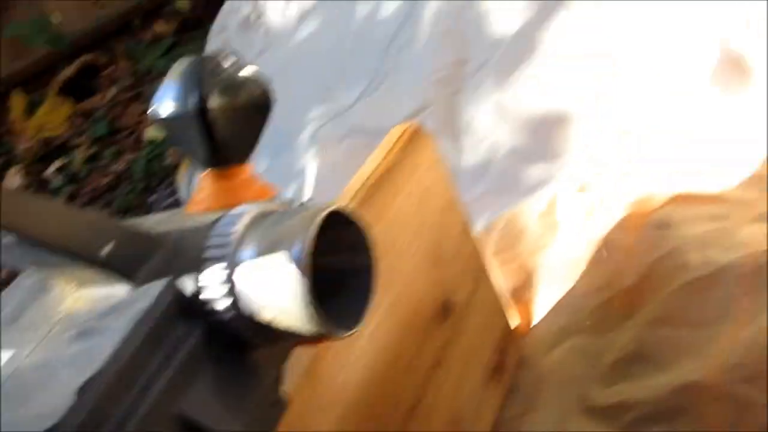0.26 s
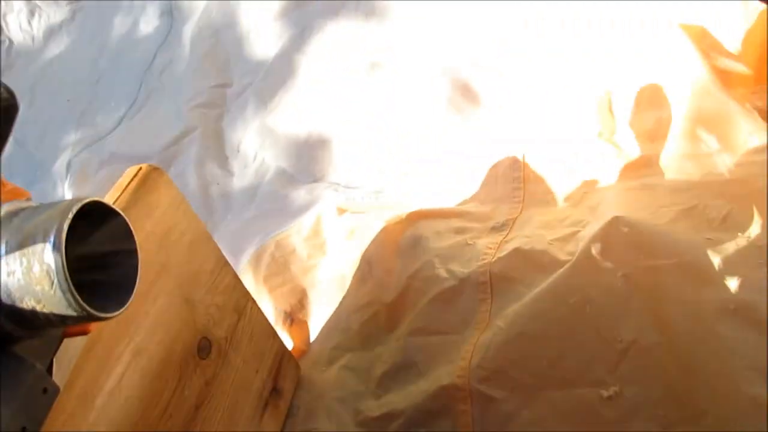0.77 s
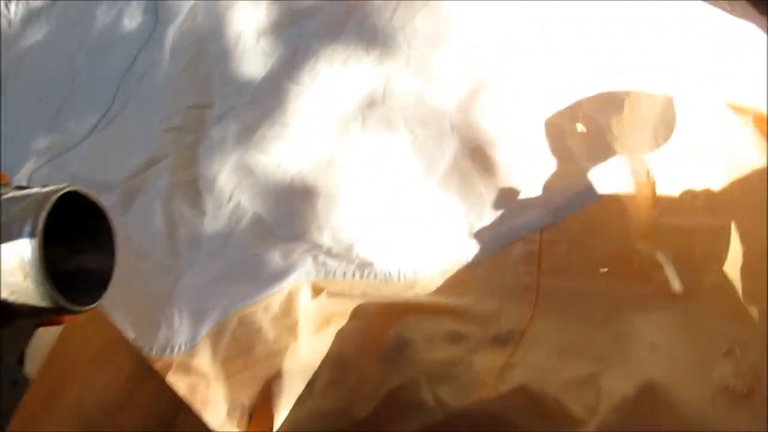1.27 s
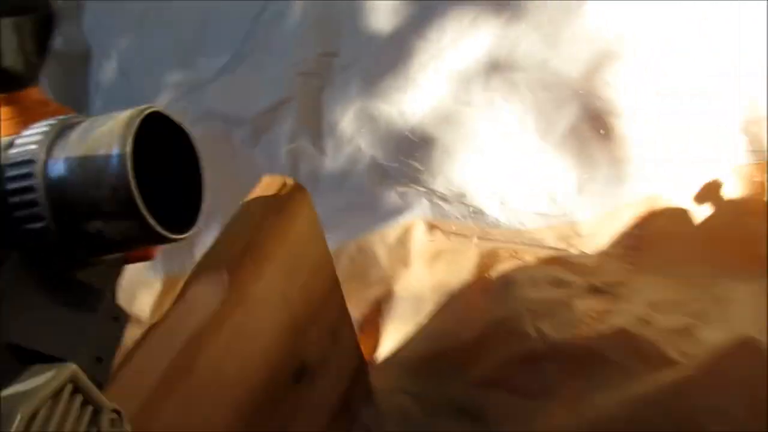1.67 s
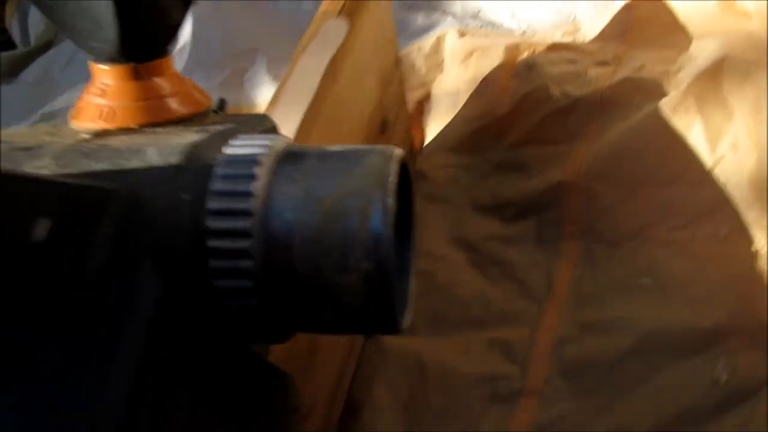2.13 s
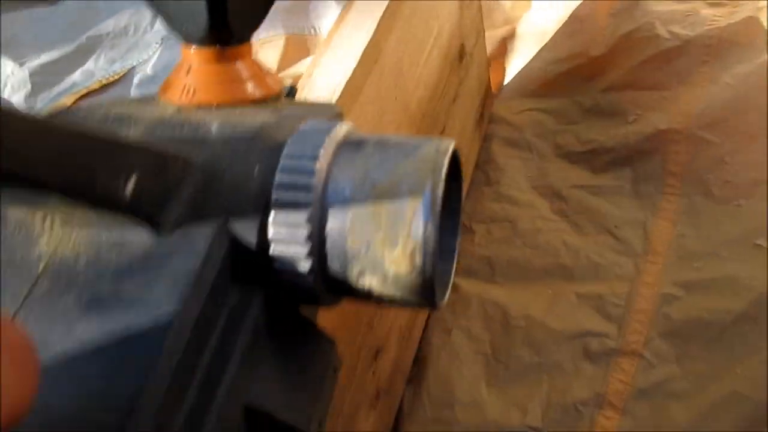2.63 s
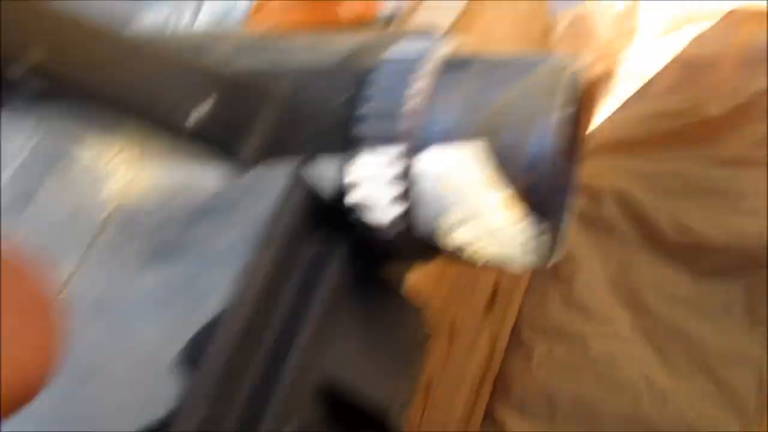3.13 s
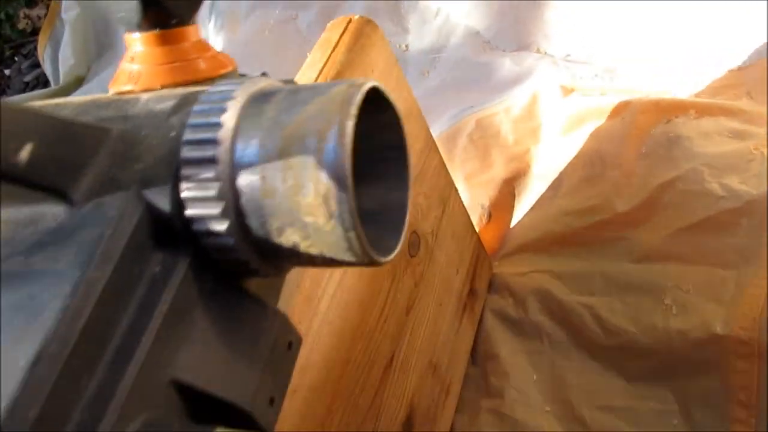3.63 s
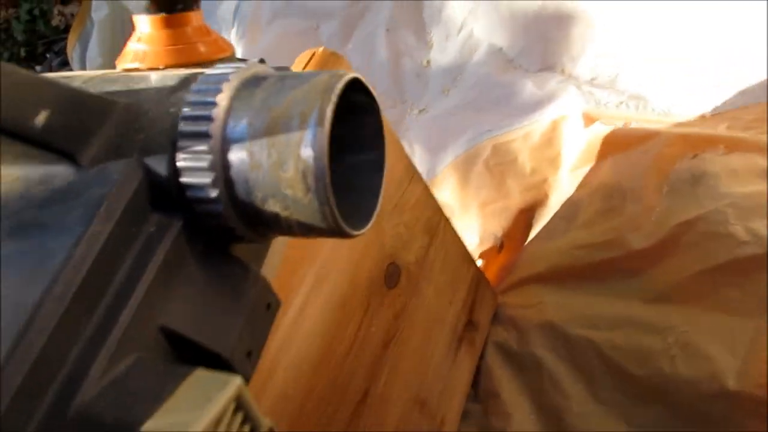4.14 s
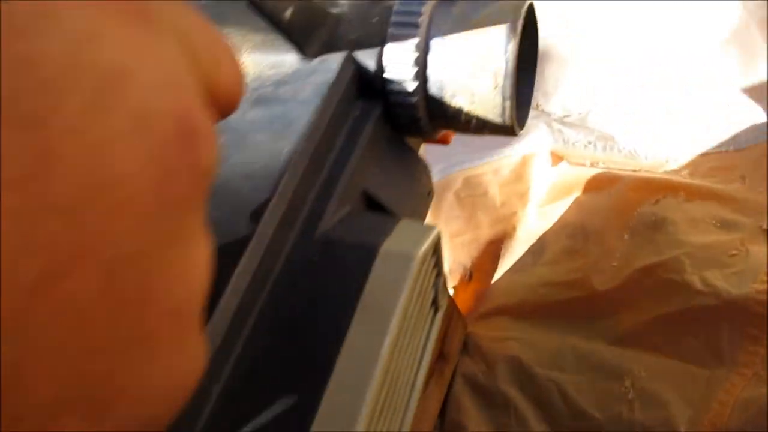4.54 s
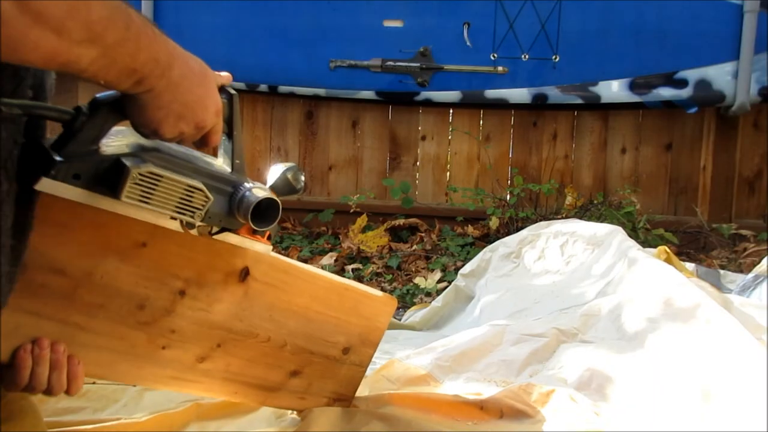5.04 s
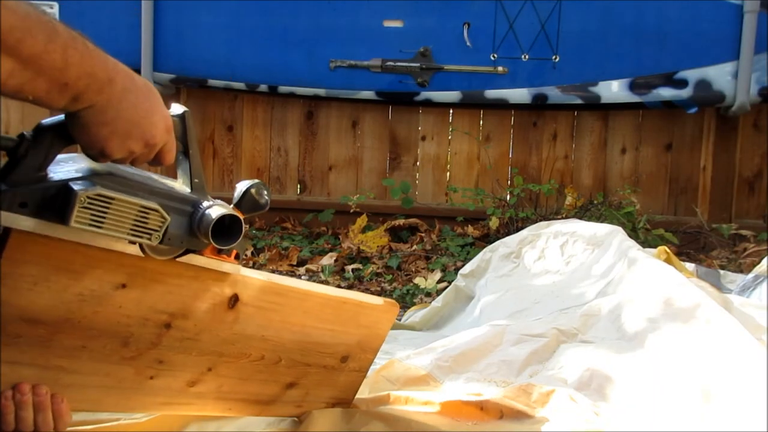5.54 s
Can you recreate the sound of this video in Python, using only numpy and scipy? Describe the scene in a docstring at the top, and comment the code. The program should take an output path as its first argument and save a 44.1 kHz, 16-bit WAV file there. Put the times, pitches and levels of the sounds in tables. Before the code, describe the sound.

Right beside the chip port, an electric planer cuts continuously with a rough, buzzing whine and blasting air, its pitch sagging and recovering. At about 4.7 seconds it cuts abruptly to a quiet yard, heard a step away: clattering knocks and a short scrape on wood, then the motor starts and sweeps quickly upward.

```python
"""Outdoors in a yard, an electric hand planer shaves a board edge, heard from right beside its chip port.
After a cut it is heard from a step away: standing still, set on the board with knocks and a scrape, starting up.
A belt ties the motor shaft to the two-knife drum, so both families of tones glide together.
Tones are sines at multiples of shaft speed; air is shaped noise chopped by the knives;
knocks, grit and the motor's buzz are impulses and noise that excite resonances."""
import sys
import numpy as np
from scipy import signal
from scipy.fft import rfft, irfft, next_fast_len
from scipy.io import wavfile
from scipy.ndimage import uniform_filter1d, map_coordinates

SR = 44100
rng = np.random.default_rng(int(sys.argv[2]) if len(sys.argv) > 2 else 0)


def dump_mix(stems):
    """Bounce the given channels to the path in sys.argv[1] as a 16-bit WAV at rate SR."""
    frames = np.atleast_2d(stems).T  # one column per channel
    limited = np.clip(frames, -1, 1)  # hard clip at full scale
    pcm = np.round(limited * 32767).astype(np.int16)
    wavfile.write(sys.argv[1], SR, pcm)


N = 255780
TIME = np.arange(N) / SR
CUT_S, SWITCH_S = 4.672, 5.398  # end of the close view, start of the motor
BELT = 2.109  # motor turns per drum turn


def amp(db):
    """The decibel law: amplitude ratio of a level in dB."""
    return 10 ** (np.asarray(db) / 20)


def unit(x):
    """Normalisation to an rms of 1."""
    return x / np.sqrt(np.mean(x ** 2) + 1e-20)


def curves(rows):
    """Linear interpolation: one value per sample for each column after the time."""
    s, *columns = np.transpose(rows)
    return [np.interp(TIME, s, column) for column in columns]


def wobble(rate_hz):
    """Slow random modulation: straight lines between random knots, rate_hz of them a second."""
    knots = rng.standard_normal(int(N * rate_hz / SR) + 4)
    return map_coordinates(knots, [TIME * rate_hz], order=1)


def bell(x, middle, length):
    """Gaussian window that is 1 at its middle and 1/e half a length away."""
    return np.exp(-(2 * (x - middle) / length) ** 2)


def peaked(rows, x):
    """Power sum of bells: a gain that rises to each row's dB around its middle."""
    power = sum(amp(2 * db) * bell(x, middle, length) for middle, length, db in rows)
    return np.sqrt(power)


def filtered(x, response):
    """Linear filtering: the spectrum of x times a complex response of frequency."""
    m = next_fast_len(N + SR // 4)
    return irfft(rfft(x, m) * response(np.fft.rfftfreq(m, 1 / SR)), m)[:N]


def along(points, hz):
    """Spectral envelope in dB, interpolated on a log frequency axis."""
    point_hz, db = np.transpose(points)
    return np.interp(np.log(hz + 1), np.log(point_hz), db, -120, -120)


def resonance(hz, centre_hz, width_hz):
    """Damped oscillator's band-pass response, with gain 1 at its centre."""
    damping = 1j * hz * width_hz
    return damping / (centre_hz ** 2 - hz * hz + damping)


def body(hz):
    """Modal superposition: resonances of the housing, sole and board, with alternating sign."""
    # modes: centre_hz, width_hz, gain_db
    modes = [(421, 24, 8), (946, 61, 5), (1140, 110, 2.5), (1404, 170, 4), (2080, 140, 6.5), (3300, 730, 0),
             (4540, 850, 3.5), (5680, 2400, -2)]
    return sum((-1) ** k * amp(db) * resonance(hz, centre, width)
               for k, (centre, width, db) in enumerate(modes))


def rush(spectrum, gate, patchy_db):
    """Turbulence noise of rms 1: gated, with random gain in patches of time and frequency."""
    z = signal.stft(gate * rng.standard_normal(N), nperseg=512)[2]
    field = rng.standard_normal(z.shape)
    field = uniform_filter1d(uniform_filter1d(field, 5, 0), 12, 1)
    x = signal.istft(z * amp(patchy_db * unit(field)), nperseg=512)[1][:N]
    return unit(filtered(x, lambda hz: amp(along(spectrum, hz))))


def tone(angle, db, flutter_db):
    """Rotational order: a sine locked to an angle, its strength and phase modulated at random."""
    size = np.sqrt(2) * amp(db + flutter_db * wobble(30))
    return size * np.sin(angle + 0.11 * wobble(40) + rng.uniform(0, 2 * np.pi))


def air_levels(table, parts):
    """Spectral balance: each part follows the level and its own share of the brightness, in dB."""
    level_db, bright_db = curves(table)
    return [db + level_db + share * bright_db for db, share in parts]


def air(drum, levels_db):
    """Flow modulation: the knives chop the air stream twice a turn, one harder than the other."""
    # noise shaped by the housing, the port, the jet and as hiss: frequency_hz, relative level_db
    housing = [(24, -87), (40, -39.5), (214, -22), (371, -20), (427, -13), (729, -10.5), (852, -7),
               (997, -11.5), (1280, -10.5), (1700, -23.5), (2210, -55), (3740, -120)]
    port = [(1300, -16), (1650, -7.5), (1950, -0.5), (2250, -4), (2900, -4.5), (3300, -42)]
    jet = [(2600, -25), (3000, 1), (4200, 1), (5500, -2.5), (6200, -7), (6800, -38)]
    hiss = [(5400, -16), (6200, -0.5), (8000, -3), (10500, -5), (12000, -8.5), (13000, -6.5), (15000, -18),
            (16000, -18)]
    chop = np.exp(0.11 * np.cos(drum) + 0.32 * np.cos(2 * drum))
    parts = [rush(housing, chop, 1.3), rush(port, chop, 1.1), rush(jet, chop, 1.13), rush(hiss, chop, 2.26)]
    return sum(amp(db) * part for db, part in zip(levels_db, parts))


def yard():
    """Ambient sound: far traffic and leaves as broadband noise, a mains hum as tones, from the cut on."""
    # yard noise: frequency_hz, relative level_db
    spectrum = [(20, -23), (85, 8), (200, 1.5), (330, -1.5), (670, -4.5), (900, -6.5), (2000, -11.5),
                (5000, -23), (10000, -23), (14500, -34), (16000, -45)]
    # mains hum nearby: frequency_hz, rms level_db
    hum_tones = [(120, -41)]
    level_db = -41
    hum = sum(tone(2 * np.pi * hz * TIME, db, .4) for hz, db in hum_tones)
    return (amp(level_db) * rush(spectrum, 1, 1.5) + hum) * (TIME > CUT_S)


def handling():
    """Impact and noise excitation: knocks ring the body and thud in the board, rough noise fills its modes."""
    # knocks, the sole meeting the board, the last two rows the click of the switch: start_s, blow_db (drive of
    # the body), thud_db
    knocks = [(4.712, -8, -15.5), (4.75, 1, -37), (4.754, 0, -32), (4.766, -2, -38.5), (4.7908, 9, -27.5),
              (4.798, -1, -35.5), (4.843, -16, -40.5), (4.865, -10, -35.5), (4.899, -7, -15.5),
              (4.9585, -7, -12), (4.966, -3, -31.5), (5.183, -20, -23), (5.397, -26, -9.5), (5.4, 1, -30)]
    # grit snaps: start_s, drive_db
    ticks = [(4.8344, -42), (4.9442, -27), (4.9541, -30), (4.9716, -30), (5.0844, -38), (5.1994, -40),
             (5.319, -32), (5.3772, -36), (5.4121, -19), (5.5752, -13)]
    # rough noise: the dying end of the cut, then the sole sliding on wood: middle_s, length_s, level_db
    rough_spells = [(4.67, 0.034, -28), (4.8, 0.12, -31), (5, 0.38, -45), (5.16, 0.045, -34.5)]
    blows, thuds, snaps = np.zeros(N), np.zeros(N), np.zeros(N)
    t = np.arange(SR // 8) / SR

    for s, db, thud_db in knocks:
        span = slice(round(s * SR), round(s * SR) + len(t))
        contact = 0.11 * amp(-60 * t / 0.071) * rng.standard_normal(len(t))  # loose parts settle
        contact[0] = -1  # after one sharp blow
        blows[span] += amp(db) * contact
        thud = np.sin(2 * np.pi * 140 * t) * amp(-60 * t / 0.031)
        thud += 0.3 * np.sin(2 * np.pi * 410 * t) * amp(-60 * t / 0.05)
        thuds[span] -= amp(thud_db) * thud
    for s, db in ticks:
        snaps[round(s * SR):][:len(t)] += amp(db - 60 * t / 0.01) * rng.standard_normal(len(t))

    grit = rng.standard_normal(N) * amp(3.5 * wobble(200))
    muffled = filtered(grit, lambda hz: body(hz) / (1 + 1j * hz / 1800))  # soft wood dulls it
    rough_noise = peaked(rough_spells, TIME) * unit(muffled) * (TIME > CUT_S) * (TIME < SWITCH_S)
    ringing = filtered(blows, lambda hz: body(hz) / (1 + 1j * hz / 7000))
    brittle = filtered(snaps, lambda hz: resonance(hz, 7500, 6000))
    return ringing + thuds + brittle + rough_noise


def start_up():
    """Exponential run-up: motor and drum orders sweep through resonances and flare there."""
    # air of the start-up: time_s, level_db, brightness_db
    air_curve = [(5.4, -10, -13), (5.425, -3.5, -1), (5.45, 3.5, 0), (5.5, 1, 2.5), (5.55, 1, -1),
                 (5.6, 2.5, 1), (5.64, 0.5, 0), (5.74, 0, 0), (5.8, 1, 0)]
    # housing, port, jet, hiss: base level_db, share of the brightness
    air_parts = [(-28.5, -1.5), (-19, -0.44), (-24.5, 0.97), (-24, 1.3)]
    # where the casing radiates the rotor slots: centre_hz, width_hz, level_db
    slot_peaks = [(960, 280, -27), (2030, 550, -13), (3430, 1100, -22)]
    # where it radiates the motor fan's blades: centre_hz, width_hz, level_db
    fan_peak = [(3200, 640, -22)]
    # where it radiates the commutator's overtone: centre_hz, width_hz, level_db
    brush_peak = [(3800, 2800, -23.5)]
    # where the chip port howls with drum order 8: centre_hz, width_hz, level_db
    howl_peak = [(946, 134, -16)]
    # unloaded drum orders: multiple, level_db at 140 turns a second ahead of the port resonance
    idle_orders = [(2, -41), (4, -40), (6, -38), (10, -36), (12, -33), (14, -38), (16, -33)]
    free_hz, run_up_s, mains_hz = 160, .195, 60  # drum speed headed for, time constant, supply

    running_s = np.clip(TIME - SWITCH_S + .006, 0, 1)  # already turning a little at the switch time
    drum_hz = free_hz * (1 - np.exp(-running_s / run_up_s))
    drum = 2 * np.pi * np.cumsum(drum_hz) / SR
    motor, motor_hz = BELT * drum, BELT * drum_hz
    current = np.sin(2 * np.pi * mains_hz * TIME + 1.35) ** 2  # the field pulls twice in each mains cycle
    jitter = 1.1 * wobble(170)  # radians; random phase jitter that roughens the sweeping tones

    slots = tone(14 * motor + jitter, 0, 1.5) * peaked(slot_peaks, 14 * motor_hz) * unit(.12 + current)
    fan = tone(12 * motor + jitter, 0, 3) * peaked(fan_peak, 12 * motor_hz)
    brushes = tone(48 * motor + 2.2 * wobble(700), 0, 3) * peaked(brush_peak, 48 * motor_hz)
    howl = tone(8 * drum, 0, 1.5) * peaked(howl_peak, 8 * drum_hz)
    siren = sum(tone(k * drum + .6 * wobble(60), db, 3.6) for k, db in idle_orders)
    siren = siren * (drum_hz / 140) ** 4
    flare = filtered(siren, lambda hz: 1 + 4 * resonance(hz, 930, 170))  # chip port resonance

    air_db = air_levels(air_curve, air_parts)
    buzz = unit(filtered((0.85 + current) * rng.standard_normal(N), body))
    buzz = amp(air_db[1] - 2.0) * buzz  # follows the port's air
    rough = amp(1.2 * wobble(90) + 0.98 * current)  # brushes spark and chatter under the starting current
    out = slots + fan + brushes + howl + flare + buzz + air(drum, air_db) * rough / 1.26
    return out * np.clip((TIME - SWITCH_S) / 0.013, 0, 1)


def knives(drum, drum_hz):
    """Harmonic series of the knives' blows: drum orders, of which groups of neighbours swell together."""
    # usual level of the drum orders, each wavering at random: frequency_hz, level_db per order
    usual = [(600, -46), (1100, -40), (2000, -44), (4000, -39.5), (8000, -50), (13000, -61)]
    # spells when groups of neighbouring orders grow louder, two of them a narrow whistle near 1900 Hz:
    # middle_s, length_s, centre_hz, width_hz, level_db per order
    swells = [(0.27, .6, 3650, 460, -32.5), (0.57, 0.54, 4880, 300, -28.5), (1.03, 0.38, 2850, 400, -28),
              (1.2, 0.55, 3560, 390, -31.5), (1.12, 0.3, 6200, 320, -30.5), (1.12, 0.44, 8300, 2100, -38.5),
              (2.89, 0.21, 2700, 200, -27.5), (3.004, 0.16, 5940, 1050, -29),
              (2.95, 0.28, 5700, 8900, -38.5), (3.285, 0.32, 3970, 590, -25),
              (3.33, 0.22, 4840, 750, -27.5), (3.48, .4, 4270, 550, -30), (3.8, 0.35, 3600, 1200, -32),
              (3.82, 0.26, 6000, 1000, -32), (3.41, 0.53, 7800, 3300, -38.5), (2.3, 0.51, 1860, 140, -32),
              (3.03, 0.34, 1915, 220, -27.5), (0.73, 0.43, 1085, 100, -33)]
    out, step = np.zeros(N), 128  # levels are computed every 128 samples
    t = TIME[::step]
    for k in range(3, 60):
        hz = k * drum_hz[::step]
        power = amp(2 * along(usual, hz) + 8.8 * wobble(2.9)[::step])
        late = t - rng.normal(0, 0.015)  # the orders do not rise all at once
        for s, length, centre, width, db in swells:
            power = power + amp(2 * db) * bell(late, s, length) * bell(hz, centre, width)
        size = np.sqrt(2 * power) * amp(2.23 * wobble(14)[::step])
        out += np.interp(TIME, t, size) * np.cos(k * drum + rng.normal(0, 0.98))
    return out


def shaving():
    """Order spectrum of two geared shafts, close by: drum tones, motor whistles, knife blows and air."""
    # the drum slows under load: time_s, drum_hz (turns a second)
    speed = [(0, 218.4), (0.45, 217.3), (1.2, 214.42), (1.4, 214.65), (1.6, 215.42), (1.7, 217.33),
             (1.8, 214.82), (2.2, 199.81), (2.5, 208.83), (2.7, 212.79), (2.8, 214.06), (3.4, 210.72),
             (3.6, 210.35), (3.8, 210.71), (4.0, 212.09), (4.2, 215.18), (4.67, 220.5)]
    # strong tones, in the sequence of `orders`: usual rms level_db, spells as the planer moves
    # (each spell: middle_s, length_s, change_db)
    strong_tones = [(-40, [(1.3, 0.54, -10.5), (1.9, 0.34, -12), (2.71, .2, -10), (4.06, 0.14, -6.5)]),
                    (-27.5, [(.3, 0.88, -2.5), (.75, 0.29, 3), (1.4, .5, -4.5), (2.75, 0.46, -4),
                    (3.65, .7, 2)]), (-18.5, [(1.1, 0.97, -3.5), (1.7, 0.17, 3.5), (2.2, 1, -3),
                    (2.88, 0.22, 1.5), (3.16, 0.25, -2), (3.76, 0.22, 2), (4.3, 0.73, 2.5)]),
                    (-29.5, [(.14, 0.28, -24), (1.3, .3, 1.5), (1.8, .15, 4.5), (2.55, 0.88, 9),
                    (3.3, 0.35, -6), (4.5, 0.66, 6)]), (-28, [(.2, 0.34, 4), (.7, .3, -2),
                    (1.08, 0.44, 6.5), (1.66, 0.13, 4), (2.71, 0.22, 5), (3.16, 0.18, -5),
                    (3.65, 0.31, 5.5), (4.36, 0.13, -2)]), (-29, [(1.02, 0.24, -11), (1.36, .35, 6),
                    (2, 0.34, -21), (2.41, 0.18, -20), (2.75, .45, -8), (3.7, 0.9, -30), (4.3, 0.18, -12)]),
                    (-30, [(.16, 0.11, 5.5), (.75, 0.17, -2), (1.06, 0.13, -7), (1.7, 0.093, 1),
                    (2.35, 0.6, 3.5), (2.95, 0.39, -8), (3.6, .15, -8), (4.1, 0.21, -12),
                    (4.38, 0.16, 3.5)]), (-45, [(.3, .7, 8.5), (1.36, .2, 5), (1.72, 0.32, -20),
                    (3.05, .5, -12)])]
    # weak motor orders: multiple of motor speed, level_db
    shaft_orders = [(1, -38), (2, -37.5), (3, -43.5), (5, -38), (14, -43.5)]
    # air as the port swings about: time_s, level_db, brightness_db
    air_curve = [(0, 0.5, 0), (.12, 3, 0), (.32, 0.1, 0.5), (.62, -0.5, 2), (1.03, 0, 1.5), (1.56, -1, 3),
                 (1.7, 0.7, -1.5), (1.9, -2.5, -0.5), (2.21, 0.8, -2.2), (2.45, 0.4, -3), (2.73, .5, -2),
                 (2.9, 0.5, 0), (3.04, 2, 0), (3.19, -1, -2.7), (3.33, 0.2, 1.5), (3.52, 0, 0),
                 (3.9, 0.4, 0.5), (4.01, -0.4, -0.9), (4.36, 0.8, 0.5), (4.67, 0.5, -1.5)]
    # housing, port, jet, hiss: base level_db, share of the brightness
    air_parts = [(-27.5, -0.85), (-24.5, -0.49), (-23.5, 0.28), (-28.5, 0.69)]
    # a cavity that lifts the commutator's whine when the load pulls it down there
    sing_hz, sing_width_hz, sing_db = 10500, 470, 17.5

    drum_hz = curves(speed)[0]
    drum = 2 * np.pi * np.cumsum(drum_hz) / SR
    orders = 1, 2, 4, 6, 10, 12, 12 * BELT, 24 * BELT  # last two: motor fan's blades, commutator
    out = 0
    for k, (db, spells) in zip(orders, strong_tones):
        db = db + sum(change * bell(TIME, s, length) for s, length, change in spells)
        db = db + sing_db * bell(k * drum_hz, sing_hz, sing_width_hz)
        out = out + tone(k * drum, db, 0.61)
    out *= amp(0.53 * wobble(12))  # the grain of the wood changes along the cut
    out += sum(tone(k * BELT * drum, db, 2.0) for k, db in shaft_orders)
    out += knives(drum, drum_hz) + air(drum, air_levels(air_curve, air_parts))
    return out * np.clip((CUT_S - TIME) / 0.0023, 0, 1)


def scene():
    """Linear superposition of the yard, the handling, the start-up and the shaving."""
    return (yard() + handling() + start_up() + shaving())[None]


def record(dry):
    """Soft saturation of peaks, then a bass cut at 70 Hz and a sharp upper band limit."""
    top_hz = 15300
    soft = dry[0] / (1 + np.abs(dry[0] / .95) ** 4) ** (1 / 4)
    return filtered(soft, lambda hz: (hz < top_hz) * (1j * hz / (70 + 1j * hz)) ** 2)[None]


dry = scene()
out = record(dry)
dump_mix(out)
```